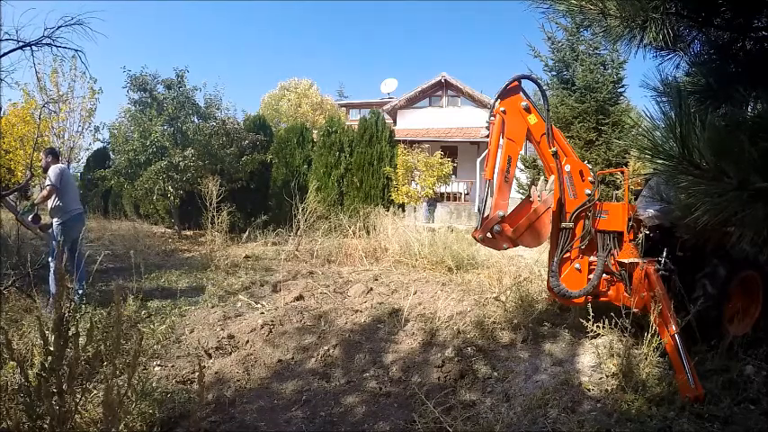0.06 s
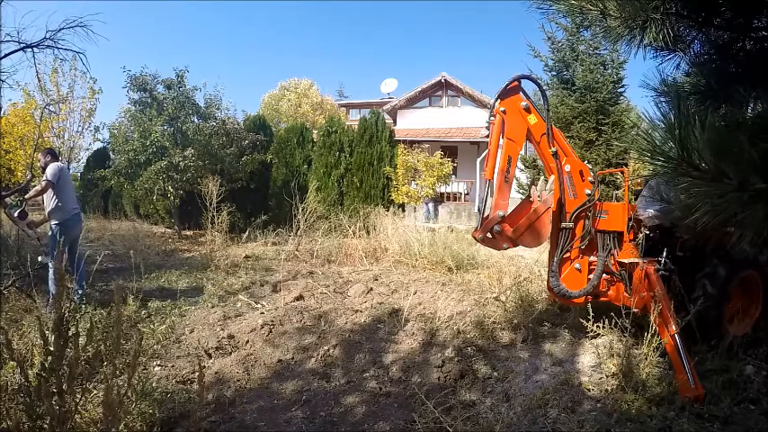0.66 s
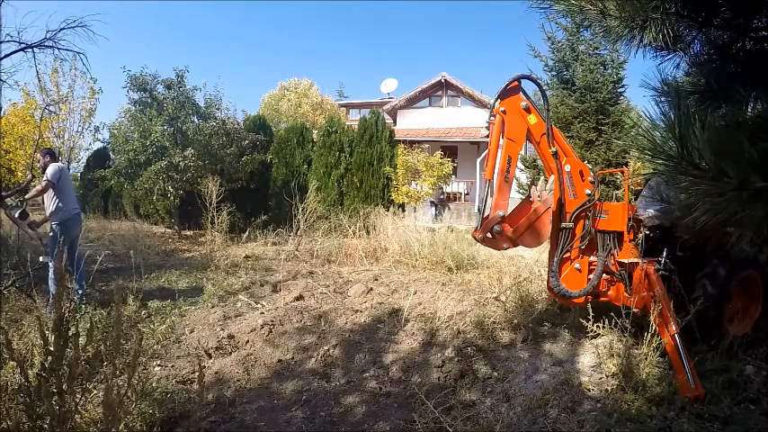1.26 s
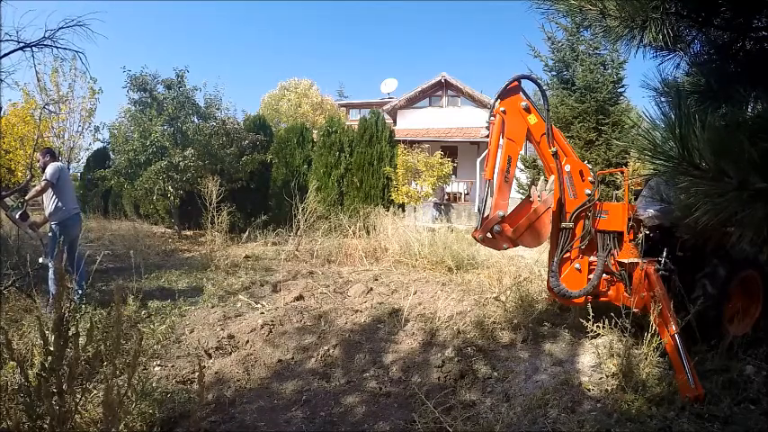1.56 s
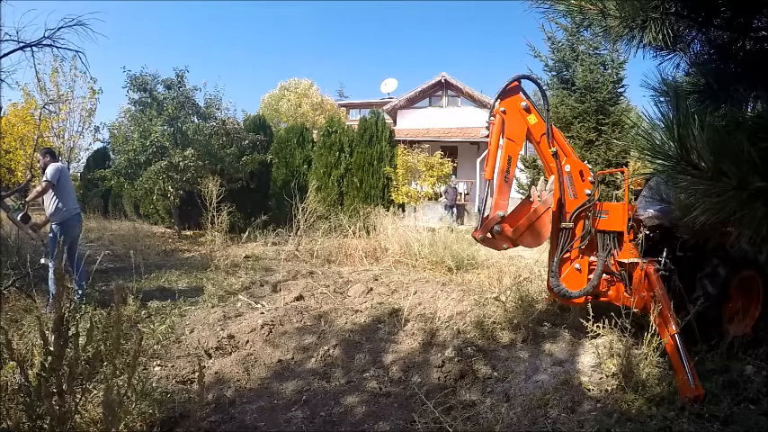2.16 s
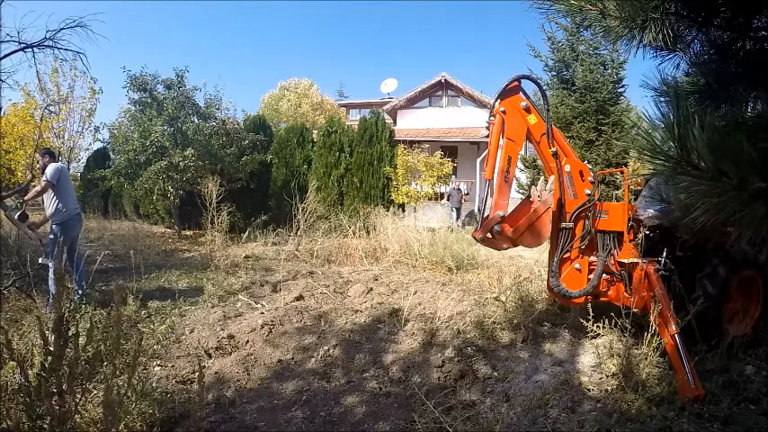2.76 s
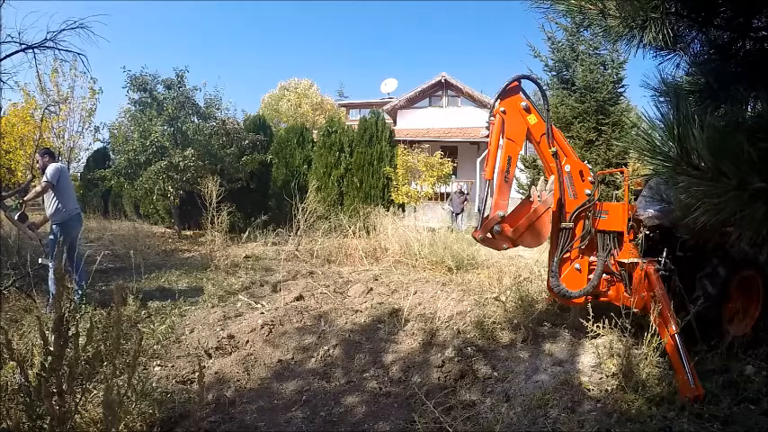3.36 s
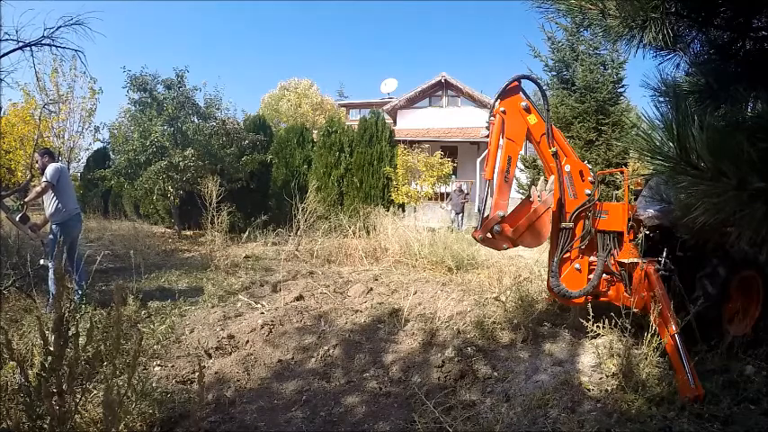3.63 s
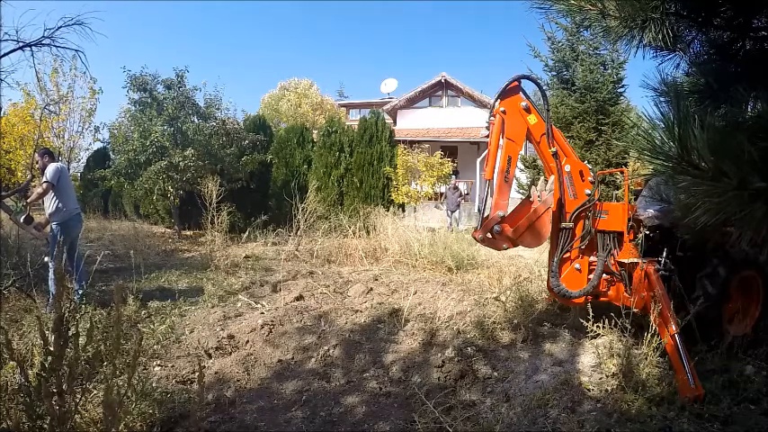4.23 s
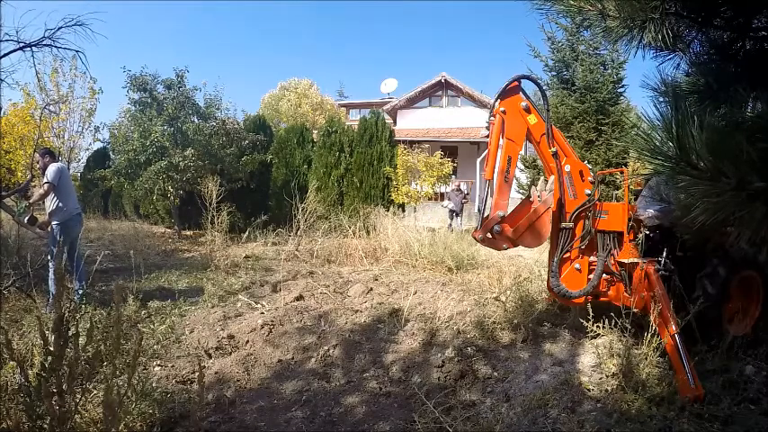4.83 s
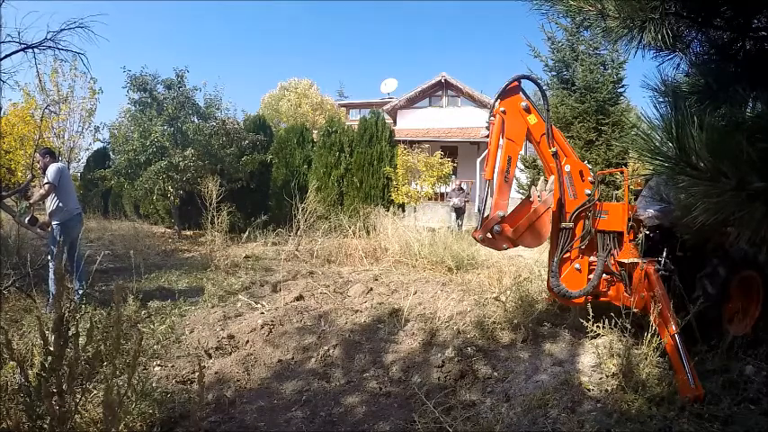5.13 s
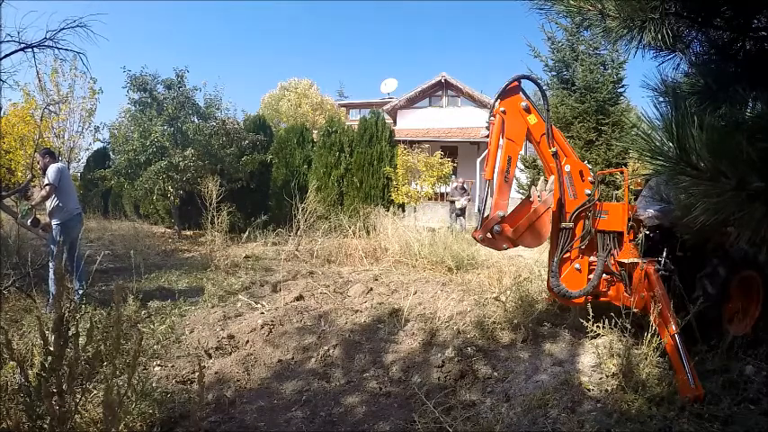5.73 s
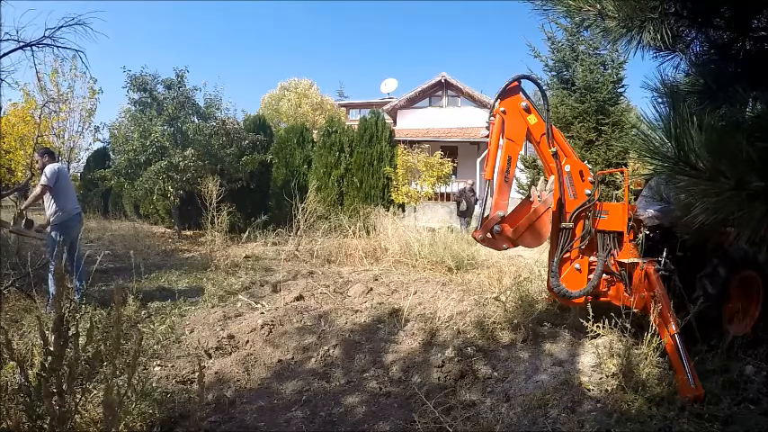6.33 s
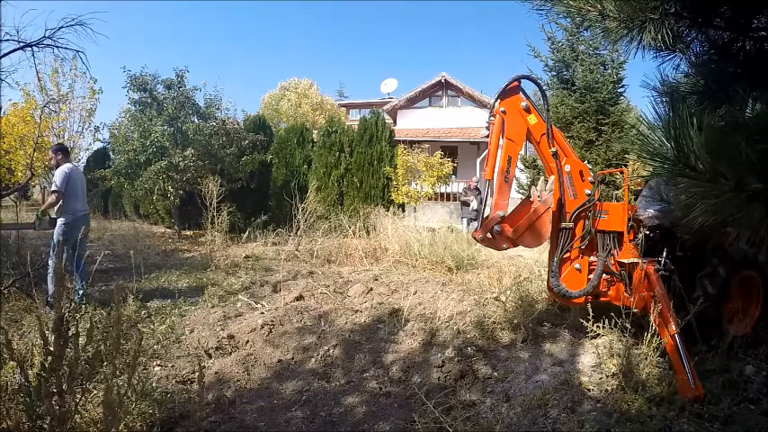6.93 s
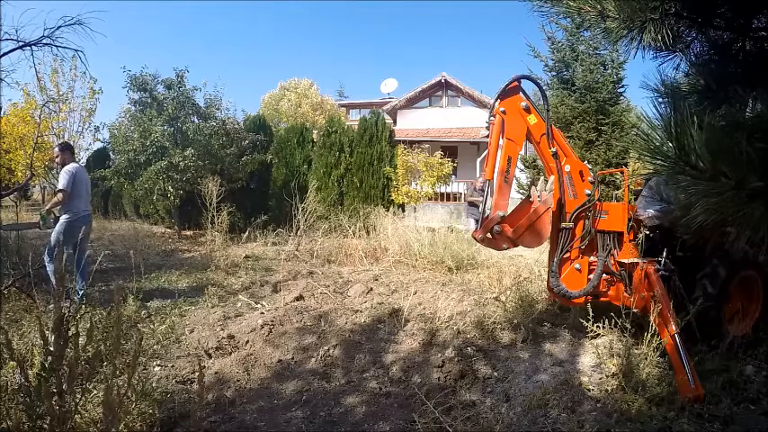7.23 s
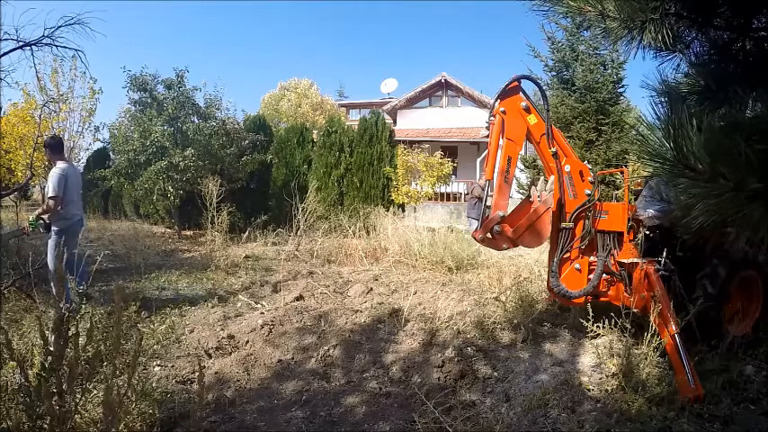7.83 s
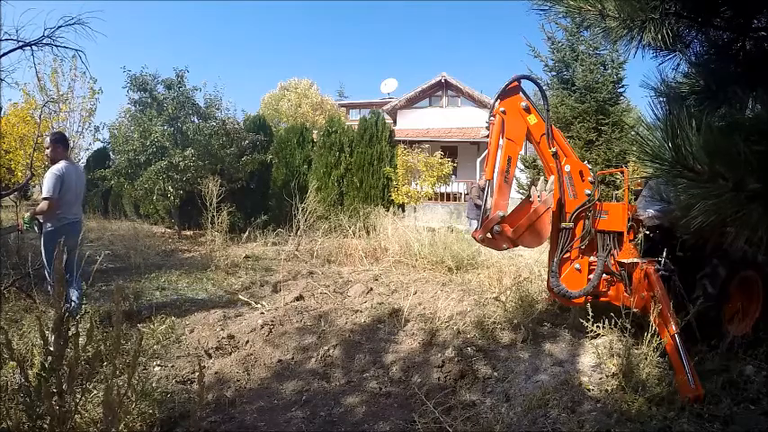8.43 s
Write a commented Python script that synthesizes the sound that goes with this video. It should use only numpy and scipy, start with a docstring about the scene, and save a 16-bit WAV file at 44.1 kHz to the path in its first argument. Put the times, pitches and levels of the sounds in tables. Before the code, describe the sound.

A whining electric chain saw chews through a thrumming branch outdoors, then coasts down, followed by a soft step and a sharp snap.

```python
"""Faint hiss and a soft electrical thump, about ten a second, come first; then an electric chain saw
spins up in a garden, chews through a branch, races as it breaks free and coasts down.
Its whine, fan rush and scraping all ring in the same housing. The branch thrums at each bite and
buzzes as it thins. At the end the worker steps back through dry grass, with one sharp snap.
The hiss and thumps come from a still, one-channel camera."""
import sys
import numpy as np
from scipy.fft import rfft, irfft, next_fast_len
from scipy.io import wavfile
from scipy.ndimage import uniform_filter1d, map_coordinates

SR = 44100
rng = np.random.default_rng(int(sys.argv[2]) if len(sys.argv) > 2 else 0)


def to_wav(s):
    """Save 16-bit WAV."""
    ch = np.atleast_2d(s).T  # columns
    pcm = np.round(np.clip(ch, -1, 1) * 32767)  # PCM
    wavfile.write(sys.argv[1], SR, pcm.astype(np.int16))


N = 383227
TIME_S = np.arange(N) / SR
ON_S, OFF_S = .39, 6.507  # the trigger is pressed and let go
CURRENT_FADE_S, SLACK_S = .046, .48  # once it is let go the drive dies, then the chain goes slack


def amp(db):
    """Decibels to gain."""
    return 10 ** (np.asarray(db) / 20)


def since(start_s):
    """Seconds since a moment, zero before it."""
    return np.maximum(TIME_S - start_s, 0)


def curves(rows):
    """Automation: one value per sample for each column after the time."""
    times, *columns = np.transpose(rows)
    return [np.interp(TIME_S, times, column) for column in columns]


def eq_curve(points, hz):
    """Gain along (freq_hz, level_db) points on a log frequency axis."""
    freqs, db = np.transpose(points)
    return amp(np.interp(np.log(hz + 1), np.log(freqs), db))


def resonances(modes, hz):
    """Gain of steep-sided resonances (centre_hz, half_width_hz, gain_db) whose powers add."""
    powers = (amp(db) ** 2 / (1 + ((hz - centre) / width) ** 2) ** 2 for centre, width, db in modes)
    return np.sqrt(sum(powers))


def filtered(x, response):
    """Shape x with a gain that depends on frequency."""
    size = next_fast_len(N + SR // 2)
    return irfft(rfft(x, size) * response(np.fft.rfftfreq(size, 1 / SR)), size)[:N]


def noise(response):
    """Coloured noise of rms 1."""
    x = filtered(rng.standard_normal(N), response)
    return x / np.std(x)


def wobble(rate):
    """A smooth random curve, rate knots a second."""
    return map_coordinates(rng.standard_normal(int(N * rate / SR) + 4), [TIME_S * rate])


def puffs(events, centre_hz, half_width_hz, attack_s, t60_s):
    """Short puffs of noise in one broad band."""
    envelope = sum((1 - np.exp(-since(start) / attack_s)) * amp(db - 60 * since(start) / t60_s)
                   for start, db in events)
    return noise(lambda hz: resonances([(centre_hz, half_width_hz, 0)], hz)) * envelope


# the bed of rumble and hiss: freq_hz, density_db (power per Hz)
AIR_BED = [(15, -73), (30, -70), (50, -74.5), (80, -84), (150, -88.5), (300, -93), (600, -100),
           (1500, -105), (5000, -109), (10000, -116), (15000, -119)]


def background(whistle_db):
    """Low outdoor rumble, microphone hiss and a thin electronic whistle."""
    air = filtered(rng.standard_normal(N) * np.sqrt(SR / 2), lambda hz: eq_curve(AIR_BED, hz))
    return air + amp(whistle_db) * noise(lambda hz: resonances([(8530, 130, 0)], hz))


def beacon_thumps(first_s, period_s, dip_db, dip_s, rebound_db, rebound_hz, t60_s):
    """The camera's radio beacon draws pulses of current: the microphone signal dips and swings back."""
    age = (TIME_S - first_s) % period_s
    progress = age / dip_s
    dip = -progress ** 2 * np.exp(2 * (1 - progress))  # a fast fall and a slower recovery
    rebound = amp(-60 * age / t60_s) * np.sin(2 * np.pi * rebound_hz * age) * (1 - np.exp(-progress))
    pulses = amp(dip_db) * dip + amp(rebound_db) * rebound
    return pulses - pulses.mean()


# a soft step on dry earth: start_s, level_db
FOOTFALLS = [(7.622, -43)]
# rustles of dry grass: start_s, level_db
GRASS_RUSTLES = [(8.52, -67), (8.615, -63)]


def step_back():
    """The worker steps back: a low thud on the earth, then crisp grass."""
    thud = puffs(FOOTFALLS, centre_hz=90, half_width_hz=90, attack_s=.004, t60_s=.1)
    grass = puffs(GRASS_RUSTLES, centre_hz=12000, half_width_hz=3000, attack_s=.02, t60_s=.25)
    return thud + grass


# the snap's cue: start_s, level_db (before gain_db)
SNAP_CUES = [(8.6198, -41.5)]
# its bright colour: centre_hz, half_width_hz, gain_db
SNAP_BANDS = [(3630, 240, 0), (5100, 500, -18), (6900, 400, -18), (10560, 1400, -23), (14000, 500, -17)]


def snap(gain_db, t60_s):
    """A short, dry snap: bright noise that starts at full strength and dies at once."""
    envelope = sum((TIME_S >= start) * amp(db - 60 * since(start) / t60_s) for start, db in SNAP_CUES)
    return noise(lambda hz: resonances(SNAP_BANDS, hz)) * envelope * amp(gain_db)


# modes of the wood left under the cut: centre_hz, half_width_hz, gain_db
THIN_WOOD_MODES = [(143, 20, 1.5), (230, 125, -13)]


def wood_buzz(parting_s, parting_db, growth_db_per_s, t60_s):
    """The thinning wood buzzes at higher modes, louder as the cut deepens, until it parts."""
    left_s = np.maximum(parting_s - TIME_S, 0)
    db = parting_db - growth_db_per_s * left_s - 60 * since(parting_s) / t60_s
    return noise(lambda hz: resonances(THIN_WOOD_MODES, hz)) * amp(db)


# the low body of the branch: freq_hz, gain_db
BRANCH_EQ = [(40, -40), (62, -26), (77, 0), (100, 2.5), (122, -8), (145, -7), (185, -25), (300, -31),
             (450, -40), (900, -70)]
# the teeth dig in and shake the branch: start_s, length_s, level_db
BITES = [(.58, 0.087, -40.5), (0.827, .39, -43.5), (1.307, .21, -40.5), (1.82, 0.5, -43.5),
         (2.62, 0.19, -39), (3.26, 0.37, -42), (3.778, .8, -41), (4.68, .7, -40), (5.5, .68, -40)]
# the freed branch swings, the chain squeaks out of the cut: start_s, pitch_hz, level_db, attack_s, t60_s
BREAK_FREE = [(6.21, 79, -34.5, 0.027, 0.85), (6.145, 555, -31, 0.035, 0.17)]


def branch(start_s, end_s, graze_db, bite_attack_s, bite_release_s, evenness):
    """The branch thrums under the teeth, louder at each bite, then swings free as the chain squeaks."""
    cutting = np.clip((TIME_S - start_s) / .02, 0, 1) * np.clip((end_s - TIME_S) / .07, 0, 1)
    force = np.full(N, amp(graze_db))
    for start, length, db in BITES:
        bite = np.minimum(since(start) / bite_attack_s, 1) * np.exp(-since(start + length) / bite_release_s)
        force = np.maximum(force, amp(db) * bite)
    thrum = noise(lambda hz: eq_curve(BRANCH_EQ, hz))
    # steady pressure on the bar keeps the swing of the branch fairly even
    thrum /= np.abs(uniform_filter1d(thrum ** 2, size=SR // 12)) ** (evenness / 2)
    sound = thrum * cutting * force
    for start, hz, db, attack, t60 in BREAK_FREE:
        age = since(start)
        envelope = amp(db - 60 * age / t60) * (1 - np.exp(-age / attack))
        sound += envelope * np.sin(2 * np.pi * hz * age + wobble(hz / 8))
    return sound


# reflections off ground, hedge and house: delay_s, gain_db
GARDEN_ECHOES = [(.006, -13), (.017, -15), (.041, -19), (.09, -23)]


def garden_echoes(direct):
    """The saw moves a little, so its echoes beat against the tones, which swell and break up."""
    echoes = sum(amp(db) * np.interp(TIME_S - delay - .00014 * wobble(3), TIME_S, direct, left=0)
                 for delay, db in GARDEN_ECHOES)
    total_power = 1 + sum(amp(db) ** 2 for _, db in GARDEN_ECHOES)
    return (direct + echoes) / np.sqrt(total_power)


# the motor sags as the chain is pressed in and races once it is through: time_s, turns_per_s
LOADED_SPEED = [(1.18, 563), (1.42, 554), (1.79, 570), (1.93, 562), (2.3, 575), (2.5, 582), (2.8, 575),
                (3.22, 590), (3.4, 570), (3.72, 578), (3.95, 571), (4.42, 572), (4.92, 580), (5.17, 580),
                (5.7, 592), (6.2, 590), (6.38, 637), (6.53, 663)]


def rotor_speed(spin_up_s, friction_hz_per_s, drag_equal_hz):
    """Turns per second: run-up, load, then braking by friction and fan drag (equal at drag_equal_hz)."""
    loaded, = curves(LOADED_SPEED)
    driven = loaded * (1 - np.exp(-(since(ON_S) / spin_up_s) ** .8))  # leaps first, then creeps
    braking = friction_hz_per_s * since(OFF_S) / drag_equal_hz
    coasting = drag_equal_hz * np.tan(np.arctan(loaded[-1] / drag_equal_hz) - braking)
    return np.where(TIME_S > OFF_S, np.maximum(coasting, 0), driven)


def motor_level(speed, driven_db, coasting_db, loss_db, fade_s, working_hz=577):
    """Level in dB: crossfades from driven to coasting at power-off, less loss_db per halving of speed."""
    power = np.exp(-since(OFF_S) / fade_s)
    halvings = np.log2(working_hz / (speed + 1))
    return power * driven_db + (1 - power) * coasting_db - loss_db * halvings


def fade_in(turns, rise_turns):
    """A gain that rises over the first few turns of the rotor."""
    return 1 - np.exp(-turns / rise_turns)


# resonances of the saw's shell: centre_hz, half_width_hz, gain_db
HOUSING_MODES = [(531.5, 66, -16), (836, 39, -15), (951, 50, -11.5), (1126, 57, 0.0), (1322, 56.5, -6),
                 (1618, 106, -12.5), (1871, 87, -2.5), (2055, 44, -1), (2155, 90, -1.2), (2503, 102, -6),
                 (2687, 78, -4.5), (3096, 216, -6), (3405, 208, -1.7), (3596, 61, 1.9), (3913, 115, -2.5),
                 (4195, 110, -11.3), (4517, 125, -10), (4820, 84, -9.5), (5114, 270, -10),
                 (6055, 280, -13.5), (6370, 210, -17), (6745, 210, -13), (7265, 196, -15),
                 (8060, 650, -24.5), (9735, 470, -16.5), (10691, 283, -22.9), (11630, 1000, -24.5),
                 (13573, 558, -26), (15076, 301, -33)]


def housing(hz):
    """Gain of the ringing housing, which colours scrape, rush and whine alike."""
    return resonances(HOUSING_MODES, hz)


# the dull tone of the scraping: freq_hz, gain_db
SCRAPE_EQ = [(450, -3), (900, 1.5), (1150, -2), (1400, -2), (2000, 0), (2700, -7), (3600, -13),
             (5000, -18.5), (15000, -20)]


def scrape(speed, turns, driven_db, coasting_db, loss_db, easing_db_per_s):
    """Brushes and chain scrape as they run, easing as the bar sinks into the cut."""
    eased_db = driven_db - easing_db_per_s * since(ON_S)
    db = motor_level(speed, eased_db, coasting_db, loss_db, CURRENT_FADE_S)
    friction = noise(lambda hz: housing(hz) * eq_curve(SCRAPE_EQ, hz))
    return friction * amp(db) * fade_in(turns, rise_turns=10)


# the bright tone of the rush: freq_hz, gain_db
RUSH_EQ = [(450, -5.5), (900, -2), (1200, -1.5), (2000, -3.5), (3000, 1), (6000, 1.5), (15000, 1.5)]
GEAR_RATIO = 4 / 11  # sprocket turns per rotor turn


def fan_rush(speed, turns, driven_db, coasting_db, loss_db, rattle_db, throb):
    """Cooling air and the running chain: a bright rush that rattles and throbs with the sprocket."""
    airflow = rng.standard_normal(N) * amp(rattle_db * wobble(700) + .37 * wobble(25))
    airflow *= 1 + throb * np.sin(2 * np.pi * GEAR_RATIO * turns)
    rush = filtered(airflow, lambda hz: housing(hz) * eq_curve(RUSH_EQ, hz))
    rush /= np.std(rush)
    treble = filtered(rush, lambda hz: hz > 8000)
    slack = 1 - np.exp(-since(OFF_S) / SLACK_S)
    rush = rush - treble + treble * amp(-3 * slack)  # duller as the chain goes slack
    db = motor_level(speed, driven_db, coasting_db, loss_db, SLACK_S)
    return rush * amp(db) * fade_in(turns, rise_turns=7)


# rotor tones ahead of the housing; order is cycles per turn, and 22 is the commutator:
# order, driven_db, coasting_db, loss_db (per halving of speed), roughness_rad
ROTOR_TONES = [(2, -46.5, -47, 11, .12), (4, -44, -46, 10, .12), (6, -45, -48.5, 3, .3),
               (8, -53, -42.5, 21, .35), (10, -46.5, -52, 12, .4), (12, -46, -54, 12, .3),
               (14, -45, -59, 16, .3), (20, -46, -62, 21, .3), (22, -35.5, -40, 19, .35)]
# tones of the geared-down sprocket, same columns; order 6 is its teeth
SPROCKET_TONES = [(4, -52.5, -57, 7.3, .15), (6, -39.5, -69, 2, .18), (9, -54.5, -61, 27, .2),
                  (12, -49, -54, 8, .2)]
# the main tones beam unevenly as the saw is turned: time_s, rotor_4_gain_db, rotor_6_gain_db, teeth_gain_db
BEAMING = [(.55, -9, 2, -1), (.75, 2, 6, 6.5), (.85, 6, 5, -2), (1.1, 5.5, 1, 3), (2.05, 5.5, 1, 1),
           (2.4, -1, -2, -1.5), (3.5, 1, -3, -1), (4.3, 1, 3, 1.5), (5.6, -1, -1, -3.5), (6.5, 3, 0, 0),
           (6.9, -3, 3, 0), (7.5, -2, -6, 0), (8.25, 4, 3, 0), (8.69, -2, -3, 0)]
# the lowest rotor tone stands out once the saw is free, swelling and fading as it is lowered:
# time_s, gain_db
LOWERING_SWELLS = [(6.2, 0), (6.42, 11), (6.6, 0), (6.75, 11), (7.1, 7), (7.45, -2), (7.68, 16), (8.05, 0)]


def whine(speed, turns, flutter_db, shake_db):
    """Rotor and sprocket tones swell as they glide through the housing's resonances."""
    fourth_db, sixth_db, teeth_db = curves(BEAMING)
    second_db, = curves(LOWERING_SWELLS)
    shafts = [(1, ROTOR_TONES, {2: second_db, 4: fourth_db, 6: sixth_db}),
              (GEAR_RATIO, SPROCKET_TONES, {6: teeth_db})]
    grid_hz = np.arange(SR // 2)
    housing_gain = housing(grid_hz)
    sound = np.zeros(N)
    for ratio, tones, rides_db in shafts:
        for order, driven_db, coasting_db, loss_db, roughness in tones:
            multiple = order * ratio
            db = motor_level(speed, driven_db, coasting_db, loss_db, CURRENT_FADE_S)
            db += rides_db.get(order, 0)
            # the hand-held saw sways and shakes: each tone flutters on its own, short waves more
            db += flutter_db * (1 + multiple / 16) * wobble(8) + shake_db * wobble(45)
            gain = amp(db) * np.interp(multiple * speed, grid_hz, housing_gain)
            phase = 2 * np.pi * multiple * turns + roughness * wobble(110)
            sound += gain * np.sqrt(2) * np.sin(phase)
    # the tones only emerge once the motor has taken up the chain
    return sound * np.minimum(since(.45) / .061, 1)


def scene():
    """Saw, wood, worker and camera noises, alike in both channels."""
    speed = rotor_speed(spin_up_s=.106, friction_hz_per_s=189, drag_equal_hz=584)
    speed *= 1 + .00066 * wobble(25)  # the load on the teeth is never quite steady
    turns = np.cumsum(speed) / SR
    mix = garden_echoes(whine(speed, turns, flutter_db=1.47, shake_db=1.6))
    mix += fan_rush(speed, turns, driven_db=-37, coasting_db=-47.5, loss_db=9, rattle_db=.95, throb=.025)
    mix += scrape(speed, turns, driven_db=-41.5, coasting_db=-49, loss_db=1.5, easing_db_per_s=.4)
    mix += branch(start_s=.422, end_s=6.3, graze_db=-46.5,
                  bite_attack_s=.03, bite_release_s=.065, evenness=.55)
    mix += wood_buzz(parting_s=6.15, parting_db=-51, growth_db_per_s=7, t60_s=.55)
    mix += snap(gain_db=2.5, t60_s=.017) + step_back()
    mix += beacon_thumps(first_s=.0192, period_s=.1024, dip_db=-36.5, dip_s=.0015,
                         rebound_db=-34.5, rebound_hz=40, t60_s=.065)
    mix += background(whistle_db=-80)
    return np.array([mix, mix])


def record(dry):
    """The camera keeps nothing above its band limit."""
    return np.array([filtered(channel, lambda hz: hz < 15290) for channel in dry])


dry = scene()
out = record(dry)
to_wav(out)
```